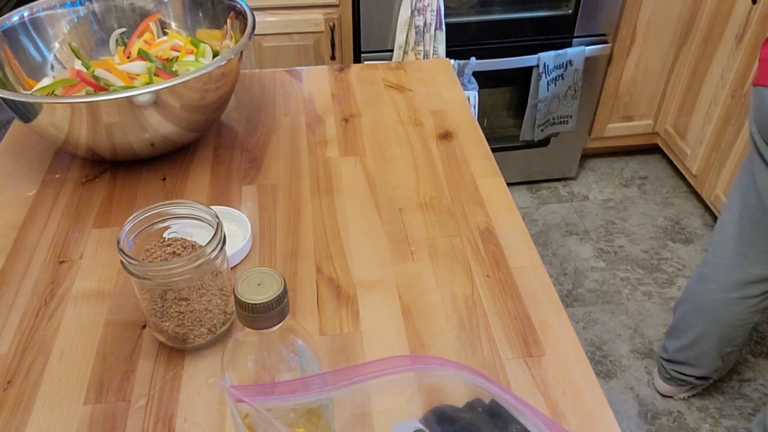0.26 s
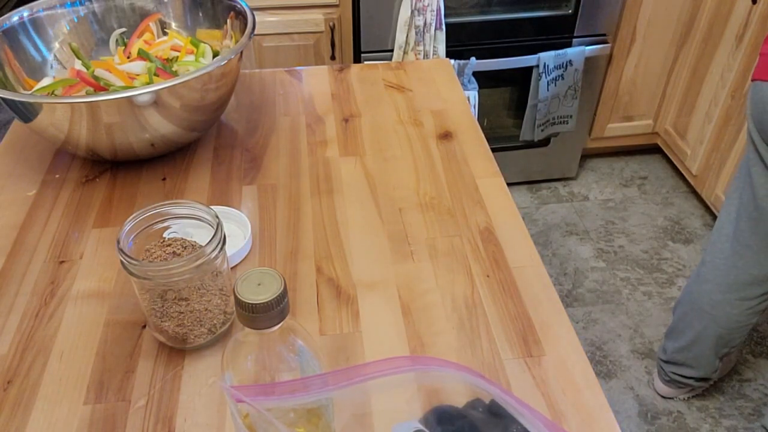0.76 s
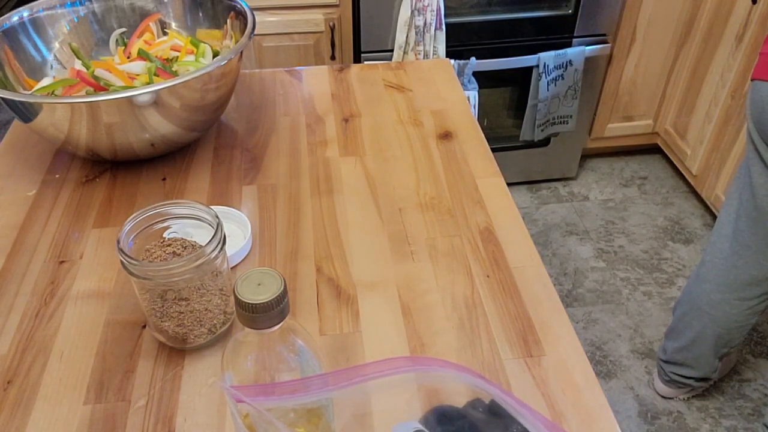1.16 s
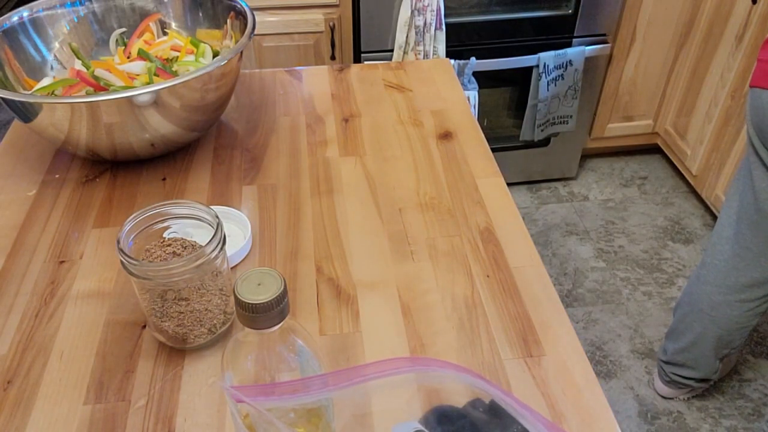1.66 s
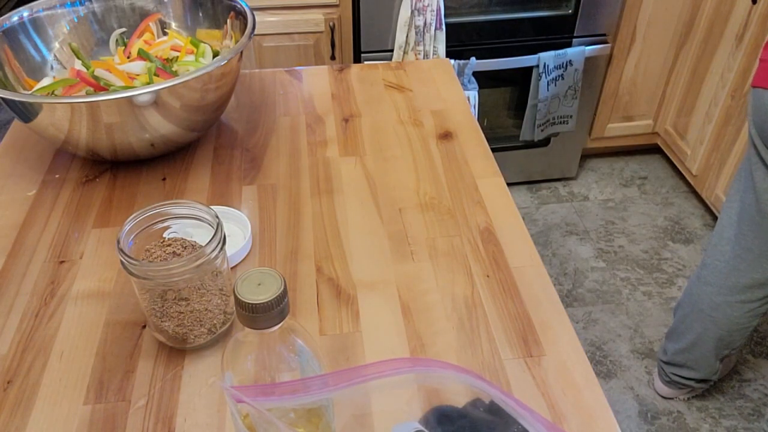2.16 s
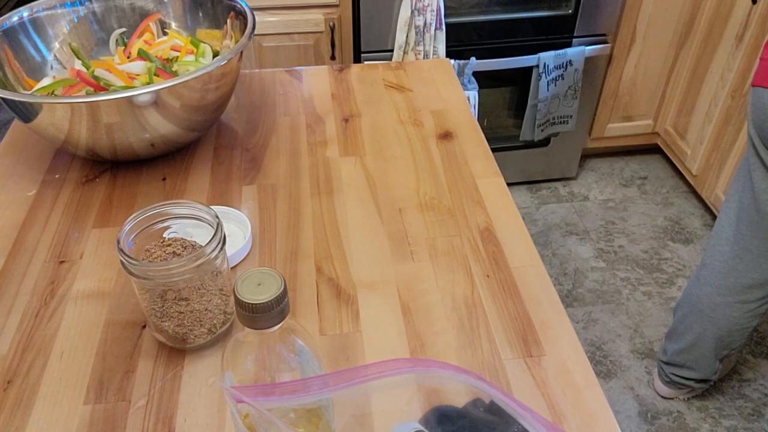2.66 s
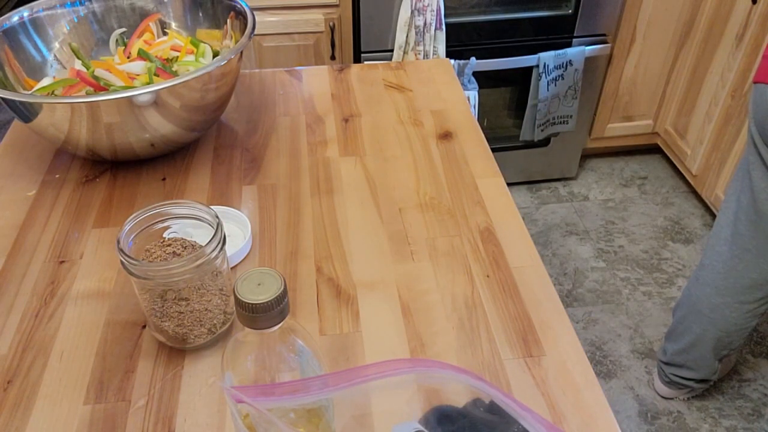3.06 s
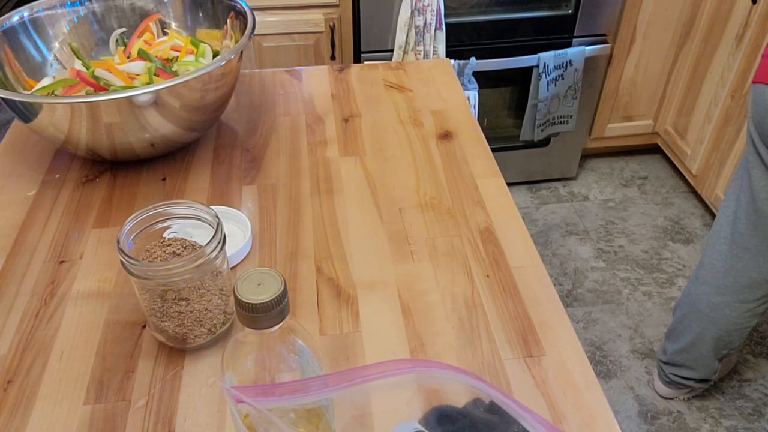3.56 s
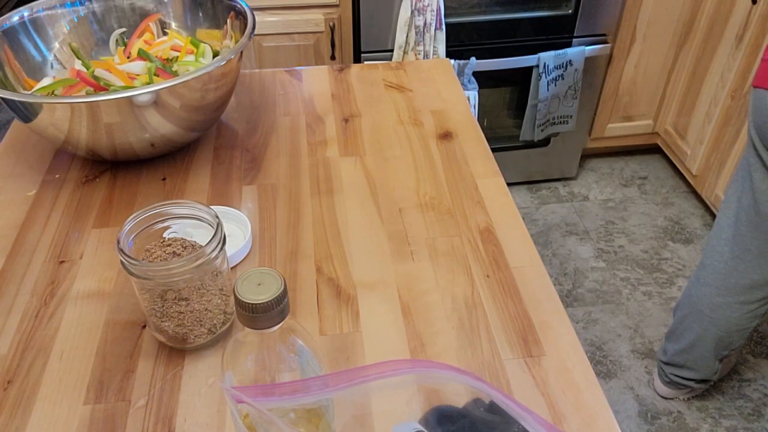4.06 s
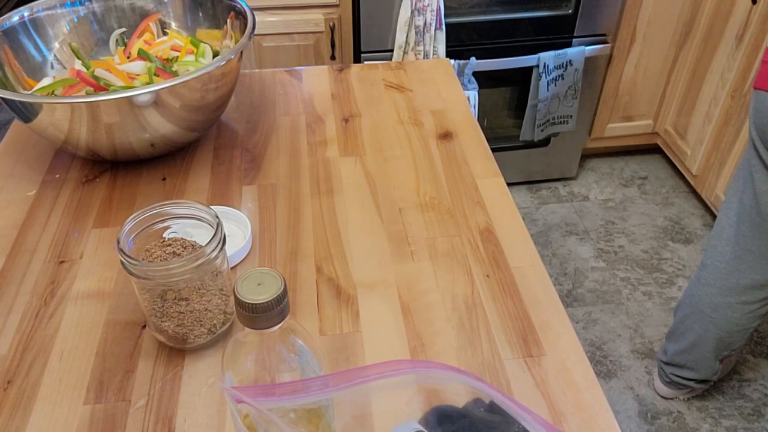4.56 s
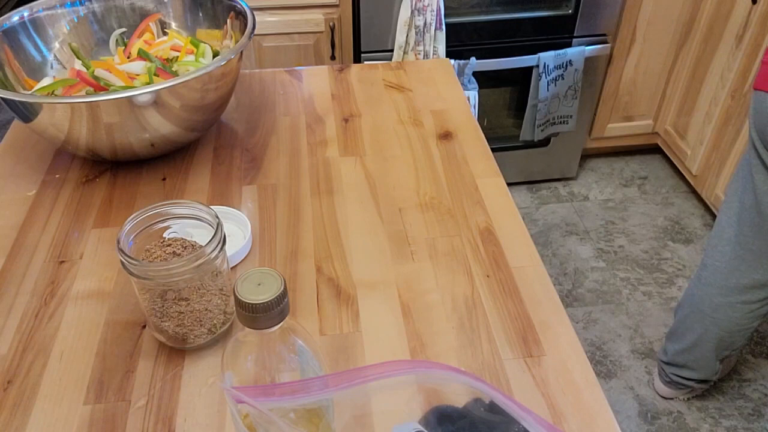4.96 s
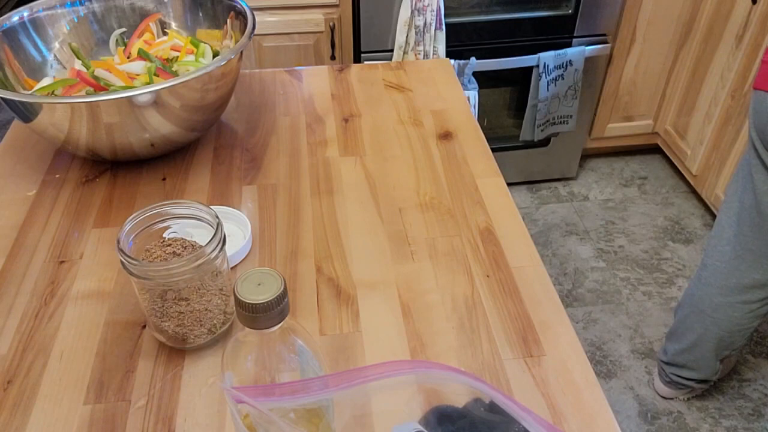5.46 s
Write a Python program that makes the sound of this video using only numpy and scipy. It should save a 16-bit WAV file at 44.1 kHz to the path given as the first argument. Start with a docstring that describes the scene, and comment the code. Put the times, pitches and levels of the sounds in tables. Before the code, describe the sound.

A short clatter, then a stronger one, as something hard knocks about in a metal basin. Water starts abruptly with a small last knock and keeps running, crisp and fizzy, with bright bubble plinks and brief gurgling gulps. Stereo pickup from a few steps away, with short lively room echoes over quiet pipe rumble and soft air hush.

```python
"""In a small kitchen with hard walls, a steel sink stands a few steps to one side of two microphones.
Something hard is set down in it twice and rattles: gritty cracks, dull knocks and ringing basin modes.
The tap opens, a last small knock follows, and a thin stream fizzes, gurgles and sprays: many bubbles,
dying tones of rising pitch, over shaped noise. The walls answer the sink with sparse, fading echoes.
Behind it, bands of drifting noise make the faint rumble of pipes and house, and the still air."""
import sys
import numpy as np
from scipy import signal
from scipy.fft import rfft, irfft, next_fast_len
from scipy.io import wavfile
from scipy.ndimage import uniform_filter1d

SR = 44100
rng = np.random.default_rng(int(sys.argv[2]) if len(sys.argv) > 2 else 0)


def invert_db(level):
    """Linear amplitude ratio for a level in decibels (20 dB per decade), elementwise."""
    return 10 ** (np.asarray(level, dtype=float) / 20)


def put_to_file(sound):
    """Save the sound as 16-bit audio at rate SR, in the file named by the first command-line argument."""
    columns = np.atleast_2d(sound).T  # one column per channel
    safe = np.clip(columns, -1, 1)
    whole_steps = np.round(safe * 32767)
    wavfile.write(sys.argv[1], SR, whole_steps.astype(np.int16))


N = 251811  # length [samples]


def evened(x):
    """Scales to rms 1."""
    return x / np.sqrt(np.mean(x ** 2) + 1e-20)


def smoothed(x, size):
    """Running mean over size samples."""
    return uniform_filter1d(x, size=size)


def read(points, hz):
    """Reads a table along a log-frequency axis."""
    f, value = np.transpose(points)
    return np.interp(np.log(hz + 1), np.log(f + 1), value)


def curve(rows, column):
    """One column of a time table, at every sample."""
    columns = np.transpose(rows)
    return np.interp(np.arange(N) / SR, columns[0], columns[column])


def add(mix, s, sound):
    """Mixes a sound in at s seconds."""
    part = mix[round(s * SR):][:len(sound)]
    part += sound[:len(part)]


def colour(x, spectrum):
    """Filters by a spectrum, to rms 1."""
    length = x.shape[-1]
    size = next_fast_len(length)
    gain = invert_db(read(spectrum, np.fft.rfftfreq(size, 1 / SR)))
    return evened(irfft(rfft(x, size) * gain, size)[..., :length])


def noise(spectrum, patchy_db, same=((1, 0), (2, 0))):
    """Two channels of random short-time spectra with drifting patches; same is their likeness by pitch."""
    frames, hz = N // 256 + 5, np.fft.rfftfreq(1024, 1 / SR)
    a, b, c, d, patches = rng.standard_normal((frames, 513, 5)).T
    patches = uniform_filter1d(patches, size=3, axis=0)  # across pitch
    patches = evened(uniform_filter1d(patches, size=6, axis=1))  # along time
    like = np.clip(read(same, hz), -1, 1)[:, None]
    left = a + 1j * b
    right = like * left + np.sqrt(1 - like ** 2) * (c + 1j * d)
    z = np.array([left, right]) * invert_db(read(spectrum, hz)[:, None] + patchy_db * patches)
    return evened(signal.istft(z, nperseg=1024, noverlap=768)[1][:, :N])


# Each bump in the sink, with relative levels of its parts:
# (time [s], crack level [dB], ring level [dB], thud level [dB], boom level [dB])
BUMPS = [(0.112, -21, -30, -30.5, -31.5), (0.138, -42, -55, -56, -54), (.169, -39, -55, -45, -31),
         (.190, -28, -20.5, -27.5, -46), (.199, -45, -55, -48, -22.5), (.230, -27.5, -38, -28.5, -47),
         (.249, -40, -25.5, -23.5, -22), (0.273, -27.5, -30, -38, -41), (.320, -38.5, -41, -31.5, -53),
         (.364, -46, -39.5, -33, -28), (.409, -52.5, -44.5, -39.5, -33.5), (.629, -15, -34.5, -37, -30),
         (.634, -12, -36.5, -30, -51), (.643, -34, -21, -39, -49), (.657, -24, -19.5, -17, -19),
         (.672, -22.5, -26.5, -39, -27), (.699, -19.5, -24, -23, -19.5), (.715, -24.5, -29, -33, -30),
         (.750, -31.5, -36, -27.5, -45), (.785, -28.5, -33, -29.5, -30.5), (.829, -32, -37, -33.5, -27),
         (.854, -36.5, -40, -37, -37), (.900, -41, -41, -34, -35), (.926, -45.5, -35.5, -35.5, -42),
         (.989, -46, -44.5, -54, -48), (1.194, -33, -56, -52.5, -49)]
# Gritty part of a bump: (frequency [Hz], relative level [dB per Hz])
CRACK_SPECTRUM = [(880, -18.5), (1500, -15), (2130, -10), (2590, -9), (3650, -8), (4350, -10), (5290, -10),
                  (7160, -14), (9140, -31), (10300, -31.5), (14200, -34.5), (15500, -54.5)]
# Dull part of a bump: (frequency [Hz], relative level [dB per Hz])
KNOCK_SPECTRUM = [(60, -29.5), (150, -3), (400, 4), (900, 10), (1250, 7), (2000, -1), (3000, -2.5),
                  (4200, -36)]
# Modes of the steel basin: (frequency [Hz], relative level [dB], t60 [s])
BASIN_MODES = [(77, -19.5, 0.27), (123.2, -3.5, 0.14), (180.7, -5, 0.2), (203.5, 2.5, 0.12),
               (246.8, -6.5, 0.27), (337.7, 6.5, 0.049), (503.6, -3.5, 0.076), (532, -9, 0.068),
               (585, -8.5, 0.095), (734, -7.5, 0.093), (851, -0.5, 0.09), (899, -0.5, 0.062),
               (1084, -7.5, 0.079), (1215, 2, 0.037), (1371, -3, 0.042), (1880, -20, 0.064),
               (2200, -17, 0.032)]


def landings():
    """Each bump: a gritty crack, a dull knock without pitch, and a push into the modes of the basin."""
    out, t = np.zeros(N), np.arange(SR // 4) / SR
    grit = rng.standard_normal((len(BUMPS), 3, len(t)))
    contacts = invert_db(4.56 * evened(smoothed(grit[:, 2], 60)))  # the surfaces touch in uneven grains
    spot_db = 1.5 * rng.standard_normal((len(BUMPS), len(BASIN_MODES)))  # each bump meets another spot

    # t60 of 39 and 36 ms, each with a soft onset
    cracks = colour(grit[:, 0] * contacts, CRACK_SPECTRUM)
    cracks *= invert_db(-2.5 - 60 * t / 0.039) * (1 - np.exp(-t / 0.00056))
    knocks = colour(grit[:, 1] * contacts, KNOCK_SPECTRUM)
    knocks *= invert_db(4 - 60 * t / 0.036) * (1 - np.exp(-t / 0.0017))

    hz, db, t60 = (column[:, None] for column in np.transpose(BASIN_MODES))
    modes = invert_db(db - 60 * t / t60) * np.sin(2 * np.pi * hz * t) * (1 - np.exp(-t * hz / 0.99))
    # boom drives the modes under 230 Hz, thud those to 700 Hz, ring the rest
    group = np.searchsorted([230, 700], hz[:, 0])
    for (s, crack_db, ring_db, thud_db, boom_db), crack, knock, spot in zip(BUMPS, cracks, knocks, spot_db):
        push_db = np.array([boom_db, thud_db, ring_db - 5])[group]
        ring = invert_db(push_db + spot) @ modes
        add(out, s, invert_db(crack_db) * crack + invert_db(ring_db) * knock + ring)
    return out


def bubble(hz, t60, rise):
    """A dying tone whose pitch climbs as the bubble nears the surface."""
    t = np.arange(round(t60 * SR)) / SR
    swell_and_decay = invert_db(-60 * t / t60) * (1 - np.exp(-t * hz / 2))
    return swell_and_decay * np.sin(2 * np.pi * hz * t * (1 + rise * t / t60))


def bubbling(spectrum, low_hz, high_hz, per_s, cycles, spread_db, count=36):
    """Bubbles of many sizes at random moments, a few of them loud; each dies 60 dB in so many cycles."""
    loudness = invert_db(spread_db * np.minimum(rng.exponential(1, N), 4))
    starts = loudness * (rng.random(N) < per_s / SR)
    kind, out = rng.integers(0, count, N), np.zeros(N)
    for k, hz in enumerate(np.geomspace(low_hz, high_hz, count)):
        ringing = signal.oaconvolve(starts * (kind == k), bubble(hz, cycles / hz, 0.029))[:N]
        out += invert_db(read(spectrum, hz)) * hz * ringing
    return evened(out)


# The running stream, relative levels:
# (time [s], fizz level [dB], spray level [dB], weight of the fizz under 3 kHz [dB])
STREAM = [(1.05, -49.5, -56, 1.5), (1.17, -50.5, -56, 6), (1.22, -49.5, -49, -10), (1.35, -45.5, -45, 4.5),
          (1.39, -52, -52.5, 10), (1.55, -49.5, -51.5, 5), (1.77, -45.5, -48, 0), (2.13, -46.5, -46.5, 0),
          (2.22, -49, -51, 7.5), (2.5, -49, -53, 5), (2.8, -49, -47.5, 0.5), (3.05, -47.5, -45.5, -2),
          (3.41, -48, -44.5, -3), (3.5, -49.5, -50, 6.5), (3.6, -49, -48, 5), (3.75, -50, -50, 9),
          (3.87, -45, -44, -1), (4.17, -48, -48.5, 4), (4.3, -46, -47, -2.5), (4.45, -48.5, -47, 1),
          (4.68, -48, -48.5, 2.5), (4.95, -49.5, -50.5, 3), (5.05, -46.5, -48, -0.5),
          (5.15, -49, -49.5, 5.5), (5.31, -46, -43.5, -5.5), (5.47, -46.5, -48, 3.5), (5.71, -49, -49, 1)]
# Fizz of small bubbles: (frequency [Hz], relative level [dB per Hz])
FIZZ_SPECTRUM = [(880, -45), (1500, -20), (1770, -18.5), (2860, -8.5), (3300, -4.5), (5250, -1.5),
                 (5740, 1), (6230, -4.5), (7190, 0.5), (8350, -15.5), (9000, -8), (11700, -19),
                 (19800, -120)]
# Spray of droplets: (frequency [Hz], relative level [dB per Hz])
SPRAY_SPECTRUM = [(7000, -16.5), (8000, 3), (8600, -6.5), (10700, -4), (12600, 1), (14300, 0), (15800, 1)]
# Steady gurgle: (frequency [Hz], relative level [dB per Hz])
GURGLE_SPECTRUM = [(700, -51), (1100, 4), (1500, 6.5), (2000, 11), (2500, -1)]
# Loud single bubbles, bright plinks out of the fizz:
# (time [s], relative level [dB], starting frequency [Hz])
LOUD_BUBBLES = [(2.155, -39, 3460), (2.155, -38, 5860), (2.275, -45, 3230), (2.43, -39, 4020),
                (2.575, -37, 3480), (2.578, -37.5, 3100), (2.955, -38, 7040), (3.36, -33.5, 6940),
                (4.01, -40, 5950), (4.501, -34, 6080), (4.517, -36, 3780), (4.628, -37, 4080),
                (4.785, -40, 3780), (5.178, -32.5, 3140), (5.178, -39, 2200), (5.375, -34.5, 5500),
                (5.39, -38.5, 4510), (5.555, -45, 3550), (5.607, -44, 5320), (5.61, -32.5, 6470),
                (5.612, -39, 7370)]
OPEN_S, OPENING_S = 1.0435, 0.015  # the tap starts to open; time it takes


def stream():
    """Fizz, gurgle, gulps and loud single bubbles from the basin; spray and hiss spread wide."""
    flow = np.clip((np.arange(N) / SR - OPEN_S) / OPENING_S, 0, 1)
    lift_db = flow_changes()
    fizz_gain = flow * invert_db(curve(STREAM, 1) + lift_db)
    fizz = bubbling(FIZZ_SPECTRUM, low_hz=2197, high_hz=8205, per_s=3000, cycles=105, spread_db=3.0, count=90)
    gurgle = bubbling(GURGLE_SPECTRUM, low_hz=885, high_hz=2313, per_s=1200, cycles=27, spread_db=1.0)
    wander = evened(smoothed(smoothed(rng.standard_normal(N), 2500), 2500))
    gurgle_gain = flow * invert_db(-72 + 2.5 * wander)
    near = invert_db(-1.0) * fizz_gain * on_steel(fizz) + gurgle_gain * gurgle + gulps()
    for s, db, hz in LOUD_BUBBLES:
        add(near, s, invert_db(db) * bubble(hz, t60=0.044, rise=0.016))

    flicker = invert_db(0.64 * evened(smoothed(rng.standard_normal(N), 300)))  # droplets land unevenly
    spray_gain = flow * invert_db(curve(STREAM, 2) + 0.8 * lift_db)
    spray = spray_gain * noise(SPRAY_SPECTRUM, patchy_db=2.5) * flicker
    hiss = fizz_gain * on_steel(noise(FIZZ_SPECTRUM, patchy_db=5.5))
    return near, hiss + spray


# Thin steel under the stream favours some pitches and weakens others: (frequency [Hz], lift [dB])
STEEL = [(2300, 2.5), (2900, 1.5), (3390, 4.5), (3610, -3), (3790, 3), (4100, 2.5), (4370, 4.5),
         (4820, 4.5), (5110, 4.5), (5560, -2), (5760, 4.5), (5920, 1), (6490, 6), (7000, -5.5), (7300, 1)]


def on_steel(x):
    """Lets the steel ring along, and weighs the part of the fizz under 3 kHz, made by its larger bubbles."""
    hz = np.fft.rfftfreq(N, 1 / SR)
    lift_db = sum(db / (1 + ((hz - f) / 35) ** 2) for f, db in STEEL)  # half the lift 35 Hz to either side
    rung = irfft(rfft(x) * invert_db(lift_db), N)
    low = signal.sosfiltfilt(signal.butter(4, 3000, fs=SR, output="sos"), rung)
    return rung + (invert_db(curve(STREAM, 3)) - 1) * low


# Surges and slight dips of the stream: (time [s], lift before rise and fall [dB])
FLOW_CHANGES = [(1.19, 9), (2.515, 3), (2.82, 2.5), (3.07, -0.5), (3.37, 4), (4.01, 2.5), (4.5, 3),
                (4.62, -0.5), (5.18, 3), (5.605, 3.5)]


def flow_changes():
    """Lift in dB: each change of flow, a surge or slight dip, comes quickly and fades slowly."""
    out, t = np.zeros(N), np.arange(SR // 2) / SR
    onset_s, fade_s = 0.0049, 0.054
    for s, lift_db in FLOW_CHANGES:
        add(out, s, lift_db * np.minimum(t / onset_s, 1) * np.exp(-t / fade_s))
    return out


# Gulps of air, each a run of bubbles gliding in pitch:
# (time [s], length [s], relative level [dB], first frequency [Hz], last frequency [Hz])
GULPS = [(2.157, .15, -46.5, 2400, 1450), (3.68, .07, -54, 2300, 1900), (3.78, .035, -46.5, 1820, 1447),
         (3.899, 0.03, -60, 920, 700), (4.657, .06, -53, 1800, 1400), (5.087, .07, -54, 1900, 2200)]


def gulps(count=24):
    """Runs of bubbles scattered around a gliding pitch, loudest in the middle."""
    out = np.zeros(N)
    for (s, length, db, first_hz, last_hz), draws in zip(GULPS, rng.random((len(GULPS), count, 2))):
        for k, (jitter, off) in enumerate(draws):
            u = (k + jitter) / count  # place within the run, 0 to 1
            scatter = 1 + 0.314 * (2 * off - 1)
            hz = first_hz * (last_hz / first_hz) ** u * scatter
            level = invert_db(db) * np.sin(np.pi * u) ** 0.5
            add(out, s + u * length, level * bubble(hz, t60=0.032, rise=0.047))
    return out


# Likeness of the two microphones, for room and rumble: (frequency [Hz], likeness [0 to 1])
LIKENESS = [(60, 0.88), (200, 0.93), (380, 0.83), (700, 0.19), (1300, 0.083)]
# Dying away of the room: (frequency [Hz], t60 [s])
ROOM_T60 = [(125, 0.23), (500, 0.28), (2000, 0.31), (6000, 0.19), (12000, 0.1)]
# Strength of the room's answer: (frequency [Hz], relative level [dB])
WALLS = [(100, -13.5), (250, -6.5), (600, -2.5), (2000, -2.5), (8000, -1)]


def kitchen(x):
    """Sparse taps of random sign, each band dying at its own speed; the bass alike at both microphones."""
    taps = np.zeros((2, SR))
    at = np.arange(200, SR - 20, 20) + rng.integers(0, 20, (2, (SR - 201) // 20))
    np.put_along_axis(taps, at, rng.choice([-1., 1.], at.shape), 1)
    hz, t, z = signal.stft(taps, SR, nperseg=512)
    like = np.clip(read(LIKENESS, hz), 0, 1)[:, None]
    z[1] = like * z[0] + np.sqrt(1 - like ** 2) * z[1]
    decay = invert_db(-60 * t / read(ROOM_T60, hz)[:, None])
    tail = signal.istft(z * decay, SR, nperseg=512)[1]
    tail /= np.linalg.norm(tail, axis=1, keepdims=True)
    wall_gain = invert_db(read(WALLS, np.fft.rfftfreq(tail.shape[1], 1 / SR)))
    tail = irfft(rfft(tail) * wall_gain)
    return signal.fftconvolve(x[None], tail, axes=1)[:, :N]


# Rumble of the pipes: (frequency [Hz], relative level [dB per Hz])
PIPES_SPECTRUM = [(53, -44), (90, -10), (192, 3.5), (316, -11), (349, -4), (515, -3.5), (562, 2),
                  (633, -69), (737, -7), (1040, -15), (1200, -11), (1560, -42), (2640, -120)]
# Its course: (time [s], level [dB])
PIPES_LEVEL = [(0, -72.5), (.6, -65), (1.1, -65), (1.3, -67), (5.71, -67)]


def pipes():
    """Low noise from the pipes, most alike at both microphones in the bass."""
    return invert_db(curve(PIPES_LEVEL, 1)) * noise(PIPES_SPECTRUM, patchy_db=2.0, same=LIKENESS)


# Deep rumble of the house: (frequency [Hz], relative level [dB per Hz])
HOUSE_SPECTRUM = [(12, -48), (20, -18), (27, -6), (48, 4), (64, -11), (90, 6), (120, -36), (200, -120)]
# Its course: (time [s], level [dB])
HOUSE_LEVEL = [(0, -76), (3, -73), (4.5, -70.5), (5.71, -70)]


def house():
    """Deep noise of the house that slowly swells."""
    return invert_db(curve(HOUSE_LEVEL, 1)) * noise(HOUSE_SPECTRUM, patchy_db=0.7, same=LIKENESS)


# Still air: (frequency [Hz], relative level [dB per Hz])
AIR_SPECTRUM = [(410, -58), (700, -1), (1060, -5), (1220, -4), (1410, -9.5), (3540, -6), (15500, -26)]
# Its course: (time [s], level [dB])
AIR_LEVEL = [(0, -69.5), (.6, -71.5), (1.2, -73), (2.2, -71), (5.71, -76.5)]


def still_air():
    """A soft hush, independent at the two microphones."""
    return invert_db(curve(AIR_LEVEL, 1)) * noise(AIR_SPECTRUM, patchy_db=-1.2)


def scene():
    """The sink reaches the left microphone first and a little louder; the room answers."""
    near, wide = stream()
    sink = landings() + near
    right_lag_s, left_db = 0.00032, 0.76  # left_db: half up on the left, half down on the right
    direct = np.array([sink, np.roll(sink, round(right_lag_s * SR))])
    side = invert_db(np.array([[left_db / 2], [-left_db / 2]]))
    foreground = side * (invert_db(-5) * direct + kitchen(sink) + wide)
    return foreground + pipes() + house() + still_air()


def band_limit(x):
    """A steep low-pass at the top of the band."""
    return signal.sosfilt(signal.butter(12, 16650, fs=SR, output="sos"), x)


def record(dry):
    """Both microphones' treble stops steeply near 15.8 kHz."""
    edge = signal.firwin(1023, 15790, window=("kaiser", 9), fs=SR)
    mix = signal.oaconvolve(dry, edge[None], "same")
    return band_limit(mix)


dry = scene()
out = record(dry)
put_to_file(out)
```